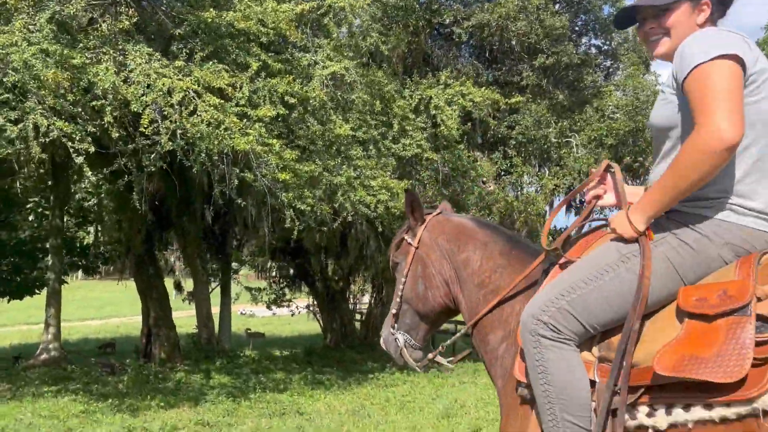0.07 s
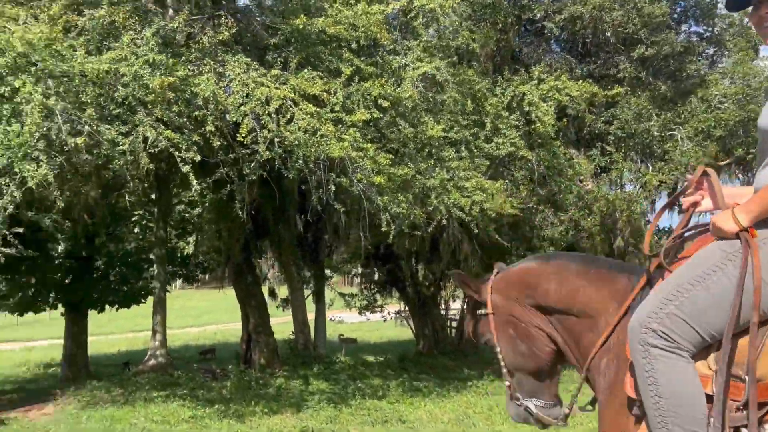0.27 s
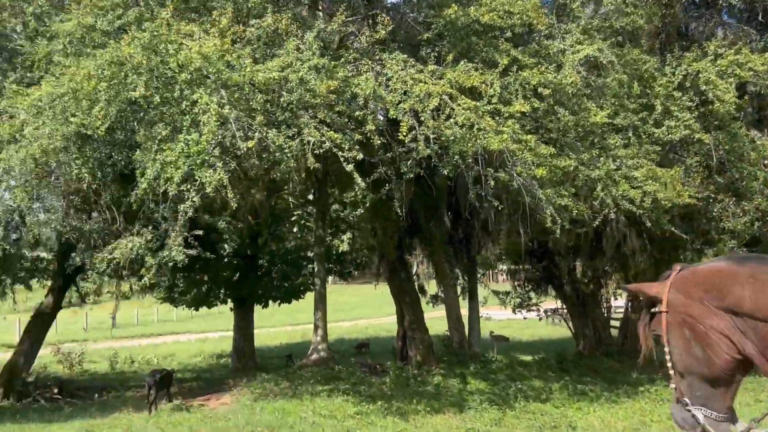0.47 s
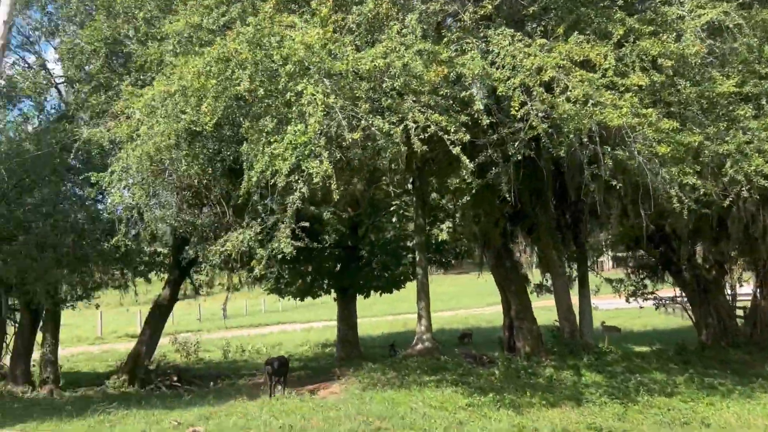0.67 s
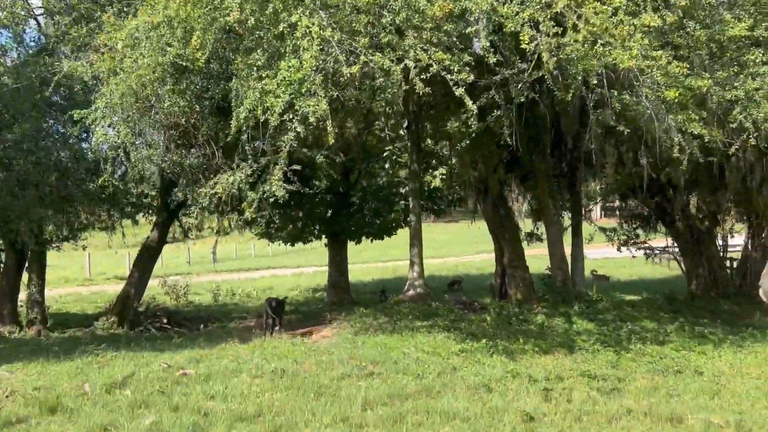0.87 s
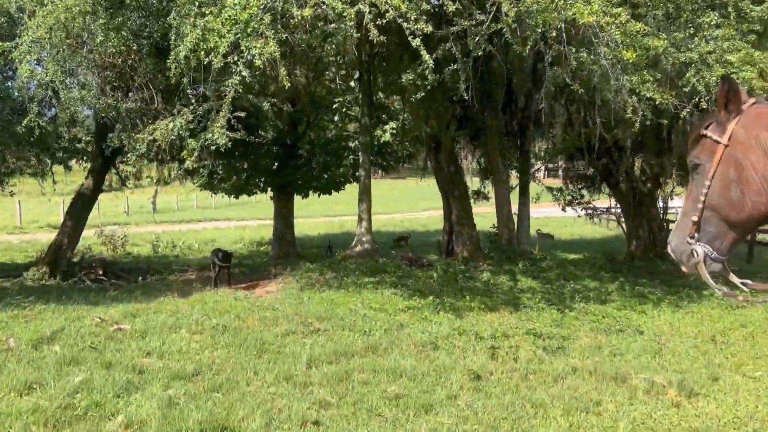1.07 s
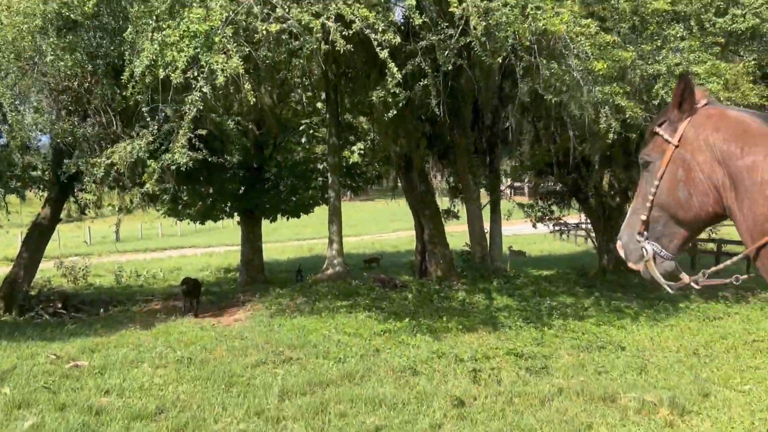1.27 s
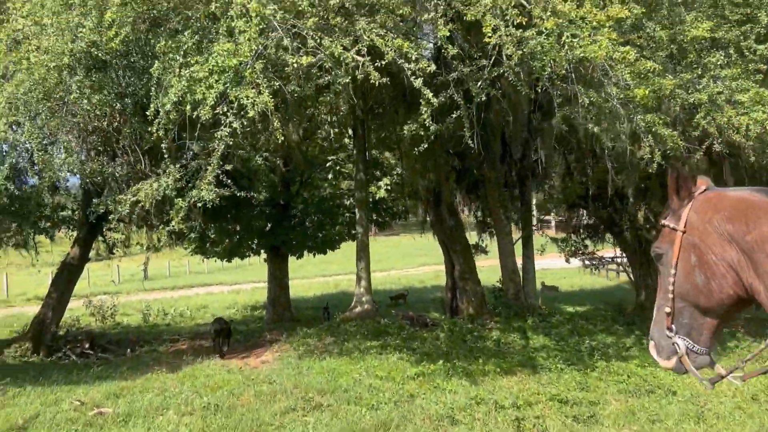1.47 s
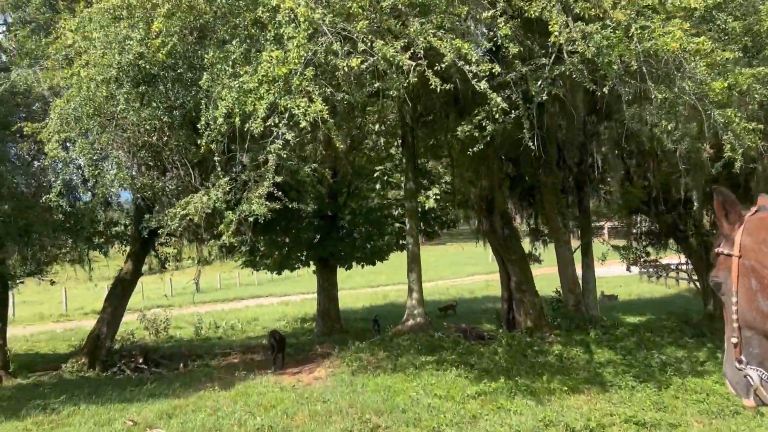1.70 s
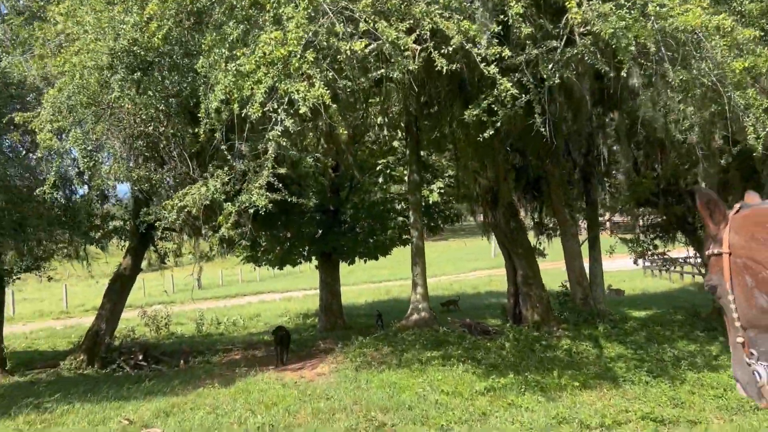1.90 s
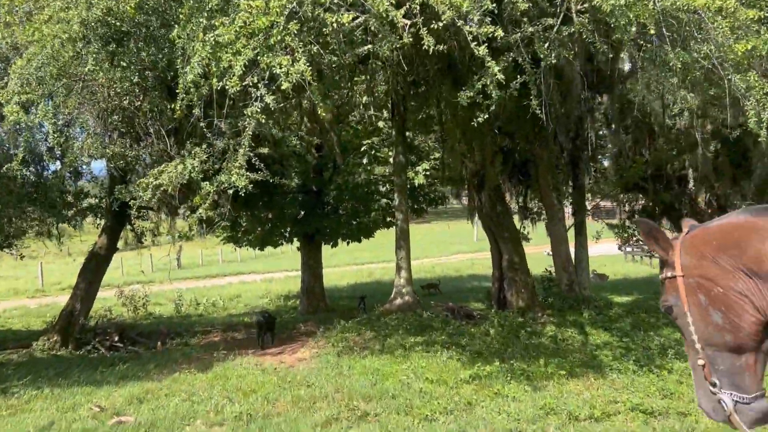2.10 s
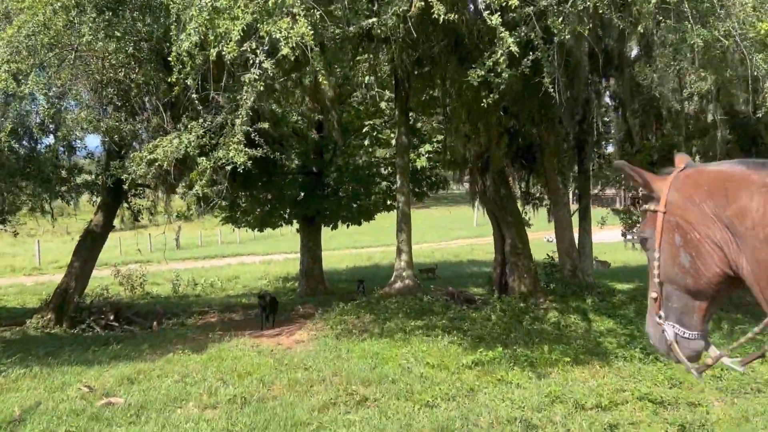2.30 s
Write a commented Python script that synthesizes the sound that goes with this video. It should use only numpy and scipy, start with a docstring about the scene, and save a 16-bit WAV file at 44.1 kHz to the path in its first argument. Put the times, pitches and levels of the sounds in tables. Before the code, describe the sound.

A horse snorts once, close by, starting at about 0.2 seconds; its nostrils flutter rapidly, then slow to a wet sputter that fades by 0.8 seconds. From about 0.6 seconds its hooves thud and scuff unevenly on soft turf until around 2.1 seconds. Brief dry rustles come from 1.3 seconds on. Light grass swishes, a low outdoor rumble and a faint hiss continue throughout.

```python
"""A pasture: a ridden horse snorts once, close by. Its nostrils flap some sixty times a second,
ringing the nose, then slow to a wet sputter as the air runs out. Its hooves then thud and scuff
on soft turf, with a fine swishing hiss of grass and brief dry rustles over a low outdoor rumble."""
import sys
import numpy as np
from scipy import signal
from scipy.fft import rfft, irfft
from scipy.io import wavfile
from scipy.ndimage import uniform_filter1d

SR = 44100
rng = np.random.default_rng(int(sys.argv[2]) if len(sys.argv) > 2 else 0)


def wav_out(sig):
    """Save sig, one row per channel (or a flat mono array), as 16-bit PCM at SR to the path in sys.argv[1]."""
    wavfile.write(sys.argv[1], SR, np.round(np.clip(np.atleast_2d(sig).T, -1, 1) * 32767).astype(np.int16))


N = 108045
T = np.arange(N) / SR
FREQS = np.fft.rfftfreq(N, 1 / SR) + 1e-3
FLICKER_DB, FLICKER_PER_S = 1.7, 35
TURF_SPREAD, TICK_SPREAD, HISS_SPREAD = .33, .25, .4  # side / middle

# spectrum of soft turf: freq_hz, gain_db
TURF_SPECTRUM = [(40, 7), (90, 10), (180, 9.5), (350, 4), (550, -4), (800, -23), (1300, -33), (3000, -31.5),
                 (8000, -84)]


def undb(db):
    """Decibels to gain."""
    return 10 ** (np.asarray(db) / 20)


def unit(x):
    """Scale to rms 1."""
    return x / np.sqrt(np.mean(x ** 2))


def curve(rows):
    """Join (time_s, value) rows by straight lines."""
    return np.interp(T, *np.array(rows).T)


def swells(rows):
    """Sum of bell envelopes from (centre_s, half_length_s, level_db) rows."""
    return sum(undb(db) * np.exp(-((T - centre_s) / half_s) ** 2) for centre_s, half_s, db in rows)


def colour(x, points):
    """Filter by (freq_hz, gain_db) points, then scale to rms 1."""
    hz, db = np.array(points).T
    gain = undb(np.interp(np.log(FREQS), np.log(hz), db))
    return unit(irfft(rfft(x) * gain, N))


def stereo(pair, spread):
    """Left and right from a middle and a side signal."""
    return (pair[0] + spread * pair[1] * np.array([[1], [-1]])) / np.hypot(1, spread)


def noise(spread):
    """Stereo white noise."""
    return stereo(rng.standard_normal((2, N)), spread)


def grains(per_s, spread):
    """Stereo clicks of random size at random moments."""
    return stereo(rng.standard_normal((2, N)) * (rng.random((2, N)) < per_s / SR), spread)


def drift(per_s):
    """Smooth random drift at rms 1."""
    hold = int(SR / per_s)
    steps = rng.standard_normal(N)[np.arange(N) // hold]
    return unit(uniform_filter1d(uniform_filter1d(steps, hold), hold))


def lag_left(x, lag_s=.000284, above_hz=1350):
    """Delay the treble of the left channel."""
    delay = np.exp(-2j * np.pi * lag_s * np.maximum(FREQS - above_hz, 0))
    return np.array([irfft(rfft(x[0]) * delay, N), x[1]])


def resonance(hz, width_hz):
    """Response of one steep resonance, keeping the power of white noise."""
    band = 1 / (1 + 1j * (FREQS / hz - hz / FREQS) * hz / (np.sqrt(2) * width_hz)) ** 2
    return band / np.sqrt(np.mean(np.abs(band) ** 2))


def resonate(drive, modes):
    """Ring parallel resonances, each from a fresh drive(hz), keeping the power."""
    spectrum, power = 0, 0
    for hz, width_hz, db, pan_db in modes:
        gain = undb(db) * np.sqrt(width_hz)
        pan = undb(np.array([[pan_db], [-pan_db]]) / 2)
        spectrum = spectrum + rfft(drive(hz)) * resonance(hz, width_hz) * gain * pan
        power += gain ** 2
    return irfft(spectrum, N) / np.sqrt(power)


def open_air(hiss_db=-53, swell_db=1):
    """A low rumble comes and goes under a faint, nearly steady hiss."""
    # rumble envelope: time_s, level_db
    rumble_levels = [(0, -38.5), (.07, -37.5), (.17, -53.5), (.26, -35), (.5, -37.5), (.8, -34.5),
                     (1.15, -35.5), (1.65, -36.5), (1.85, -34), (2.1, -38.5), (2.28, -40.5), (2.45, -37.5)]
    # rumble spectrum: freq_hz, gain_db
    rumble_spectrum = [(18, -62), (32, -18), (50, 2), (75, 1.5), (110, -9.5), (170, -14), (300, -26.5),
                       (700, -72), (3000, -69)]
    # hiss spectrum: freq_hz, gain_db
    hiss_spectrum = [(30, -4), (150, 5.5), (350, -2), (600, 2.5), (1000, -3), (2000, -7.5), (4000, -13.5),
                     (8000, -15), (16000, -33)]
    rumble = colour(noise(spread=.45), rumble_spectrum) * undb(curve(rumble_levels))
    hiss = colour(noise(HISS_SPREAD), hiss_spectrum) * undb(hiss_db + swell_db * drift(per_s=3.25))
    return rumble + hiss


def scuffs(bumps_per_s=700):
    """Many tiny bumps as the turf gives under the hooves."""
    # scuffing envelope: time_s, level_db
    scuff_levels = [(0, -43), (.07, -81), (.13, -57), (.79, -48), (.83, -38.5), (1.01, -30.5),
                    (1.06, -39.5), (1.14, -42), (1.2, -37.5), (1.41, -37), (1.52, -53.5), (1.57, -41),
                    (1.68, -46), (1.78, -51), (1.85, -45.5), (1.92, -42), (2.08, -38), (2.16, -53.5),
                    (2.31, -64), (2.38, -33.5), (2.45, -40.5)]
    return colour(grains(bumps_per_s, TURF_SPREAD), TURF_SPECTRUM) * undb(curve(scuff_levels))


def grass(blades_per_s=3600, flick_decay_s=.003, around_db=-6.5):
    """Blades brush past in swishes of dense ticks, softer all around, with a few sharp flicks."""
    # swish envelope: time_s, level_db
    swish_levels = [(0, -48), (.13, -50), (.165, -40.5), (.35, -38.5), (.6, -50), (.76, -48), (.83, -62),
                    (.91, -47.5), (.96, -59.5), (1.19, -61.5), (1.24, -44.5), (1.4, -49), (1.5, -49.5),
                    (1.52, -78), (1.565, -58), (1.595, -41.5), (1.71, -52), (1.76, -49), (1.83, -48.5),
                    (1.9, -49), (2.0, -53), (2.065, -46), (2.12, -59), (2.25, -52), (2.32, -62.5),
                    (2.37, -46.5), (2.45, -46.5)]
    # flicks of grass: start_s, level_db
    flick_events = [(0.1364, -34.5), (0.783, -47.5), (1.0074, -45), (1.397, -39), (1.498, -46),
                    (1.587, -41.5), (1.921, -47), (2.433, -37)]
    # spectrum of the near blades: freq_hz, gain_db
    near_spectrum = [(500, 3), (1200, 2), (2000, 6), (3200, -1), (5000, 0), (8500, 6.5), (12000, 7.5),
                     (16000, 7)]
    around_spectrum = [(1500, 8), (3200, 1), (6800, 3.5), (9000, -40.5)]
    flicks = sum(undb(db) * (T >= start_s) * np.exp(-np.abs(T - start_s) / flick_decay_s)
                 for start_s, db in flick_events)
    swish = undb(curve(swish_levels) + FLICKER_DB * drift(FLICKER_PER_S))
    around = colour(grains(blades_per_s, spread=1), around_spectrum) * undb(around_db)
    near = colour(grains(blades_per_s, TICK_SPREAD), near_spectrum)
    return (near + around) * (swish + flicks)


def thuds():
    """Short thuds of falling pitch, each with a hollow knock, on crumbling ground: mostly hooves, with two low
    puffs of breath as the snort fades."""
    # thuds: start_s, start_pitch_hz, level_db (the rows at 0.619 and 0.645 are low puffs of breath, the rest
    # hoof impacts)
    impacts = [(0.056, 286, -41), (0.619, 171, -22.5), (0.645, 260, -26.5), (0.736, 220, -30.5),
               (0.81, 588, -22.5), (0.819, 171, -20), (0.847, 637, -27), (0.884, 410, -32),
               (.898, 192, -25.5), (0.919, 272, -25), (.951, 473, -26.5), (0.962, 122, -21.5),
               (0.982, 650, -37), (1.006, 516, -33), (1.1872, 840, -19), (1.217, 554, -33),
               (1.232, 150, -32), (1.32, 623, -34.5), (1.388, 460, -33), (1.402, 291, -28.5),
               (1.452, 137, -31), (1.551, 656, -30.5), (1.566, 175, -28.5), (1.613, 400, -32.5),
               (1.909, 158, -26), (1.929, 892, -30.5), (1.967, 710, -28), (2.039, 610, -34.5),
               (2.062, 127, -28.5), (2.080, 832, -32)]
    end_hz, glide_s, attack_s, thud_decay_s = 63.5, .00489, .0017, .011
    knock_ratio, knock_decay_s, knock_db, crumble_db = .699, .0051, -10, -10
    crumble = undb(crumble_db) * colour(noise(TURF_SPREAD), TURF_SPECTRUM)
    out = np.zeros((2, N))
    for (start_s, hz, db), side in zip(impacts, rng.standard_normal(len(impacts))):
        age_s = np.maximum(T - start_s, 0)
        onset = 2 * undb(db) * (1 - np.exp(-(age_s / attack_s) ** 2))
        phase = 2 * np.pi * (end_hz * age_s + (hz - end_hz) * glide_s * (1 - np.exp(-age_s / glide_s)))
        tone = stereo([np.sin(phase), side * np.cos(phase)], spread=.2)
        thud = (tone + crumble) * np.exp(-age_s / thud_decay_s)
        knock = np.sin(2 * np.pi * knock_ratio * hz * age_s) * np.exp(-age_s / knock_decay_s)
        out += onset * (thud + undb(knock_db) * knock)
    return out


def turbulence(hz, wide_above_hz=700):
    """Rushing air to drive a resonance at hz, wider in stereo for higher ones."""
    return noise(spread=.55 * hz / np.hypot(hz, wide_above_hz))


def puffs(flaps_s, start_rate_hz, resonance_hz):
    """A soft slap and a puff of air per flap, uneven in time and size, over a steady leak."""
    half_s, jitter_s, scatter_db = .0043, .0024, 2.6
    leak, slap_db = .28, -12
    gate, slaps = np.zeros(N), np.zeros(N)
    for flap_s, (late, strong) in zip(flaps_s, rng.standard_normal((len(flaps_s), 2))):
        at_s = flap_s + jitter_s * late
        size = undb(scatter_db * strong)
        near = slice(int((at_s - 2 * half_s) * SR), int((at_s + 2 * half_s) * SR))
        gate[near] += size * np.exp(-((T[near] - at_s) / half_s) ** 2)
        slaps[int(at_s * SR)] = size * np.sqrt(SR / start_rate_hz)
    return (gate + leak) * turbulence(resonance_hz) + undb(slap_db) * slaps


def snort(half_narrow_s=.475, narrowing_s=.14, drops_per_s=5000, spray_db=-17.5):
    """Loose nostrils flap and spray fine drops; each flap rings the narrowing nose."""
    # nostril flapping: time_s, rate_hz
    flap_rates = [(.215, 61.2), (.37, 60.5), (.46, 53.2), (.55, 46), (.66, 37)]
    # force of the blow: time_s, level_db
    blow = [(.208, -32.5), (.23, -26), (.27, -23), (.32, -18), (.39, -21.5), (.46, -23.5), (.56, -22.5),
            (.6, -29.5), (.65, -34), (.68, -34), (.745, -54), (.79, -71)]
    # open nose resonances: freq_hz, width_hz, gain_db, left_minus_right_db
    open_modes = [(140, 70, -2, -1), (310, 80, 3, 0), (450, 220, -3, -1), (850, 110, 2.7, 5),
                  (1120, 90, -3, -1), (1400, 190, -2, -2), (1890, 110, -5, 2), (2280, 240, -9, 4),
                  (2780, 130, -7, -2), (3500, 560, -15, 2)]
    # narrowed nose resonances: freq_hz, width_hz, gain_db, left_minus_right_db
    narrow_modes = [(130, 70, -1, 0), (290, 160, -4, -2), (480, 180, -8, -1), (810, 100, 0, 1),
                    (1030, 170, -5, 3), (1530, 170, -10, 0), (2130, 210, -14, 1), (3600, 400, -22, 4)]
    spray_spectrum = [(2000, 5.5), (4000, 2.5), (6500, 2.5), (8500, -1), (11000, -16), (16000, -19)]
    start_s, start_rate_hz = flap_rates[0]
    end_s = flap_rates[-1][0]
    cycles = np.cumsum(curve(flap_rates) * (T > start_s)) / SR
    flap_count = int(cycles[int(end_s * SR)])
    flaps_s = T[np.searchsorted(cycles, np.arange(1, flap_count + 1))]
    force = undb(curve(blow)) * (T > blow[0][0]) * (T < blow[-1][0])
    narrow = np.clip(.5 + (T - half_narrow_s) / narrowing_s, 0, 1)
    nose = np.zeros((2, N))
    for modes, share in (open_modes, 1 - narrow), (narrow_modes, narrow):
        nose += resonate(lambda hz: puffs(flaps_s, start_rate_hz, hz) * force * np.sqrt(share), modes)
    spray = colour(grains(drops_per_s, TICK_SPREAD), spray_spectrum)
    spray *= force * undb(spray_db + FLICKER_DB * drift(FLICKER_PER_S))
    return nose + lag_left(spray)


def sputter():
    """As the pressure drops, the nostrils stick and burst open in separate wet flaps."""
    # wet flaps: centre_s, half_length_s, level_db
    wet_flaps = [(0.467, 0.0034, -23), (0.509, 0.0057, -34), (0.55, 0.0057, -28.5), (0.562, 0.0022, -32),
                 (.596, 0.0051, -27), (0.646, 0.015, -42), (0.697, 0.0057, -43.5), (0.737, 0.012, -49.5)]
    # wet flap resonances: freq_hz, width_hz, gain_db, left_minus_right_db
    wet_modes = [(1550, 250, -7, 0), (2180, 200, 0, 1), (3500, 300, -12, 4), (4600, 400, -16, 2)]
    bursts = swells(wet_flaps)
    return resonate(lambda hz: turbulence(hz) * bursts, wet_modes)


def last_air(peak_s=.61, peak_db=-33, rise_s=.045, fade_s=.064):
    """The remaining air leaves the still nostrils in a hollow, fading rush."""
    # still nose resonances: freq_hz, width_hz, gain_db, left_minus_right_db
    still_modes = [(330, 200, -4, 0), (800, 140, -5, 1), (1080, 100, 0, 2), (1560, 130, -7, 0)]
    envelope = undb(peak_db) * np.exp(-np.maximum((peak_s - T) / rise_s, (T - peak_s) / fade_s))
    return resonate(lambda hz: turbulence(hz) * envelope, still_modes)


def rustles(ticks_per_s=1400):
    """Short swells of dry rubbing ticks, as of the tack."""
    # rubs: centre_s, half_length_s, level_db
    rubs = [(1.307, 0.018, -45), (1.383, 0.0066, -46), (1.538, 0.051, -50.5), (1.596, 0.0058, -41.5),
            (1.882, 0.022, -41.5), (2.028, 0.003, -45), (2.432, 0.083, -48.5)]
    # rubbing spectrum: freq_hz, gain_db
    rub_spectrum = [(150, -16), (400, 12.5), (850, 10.5), (1600, -1), (2600, 1), (6000, -17)]
    return colour(grains(ticks_per_s, HISS_SPREAD), rub_spectrum) * swells(rubs)


def scene():
    """The horse on the open pasture."""
    horse = snort() + sputter() + last_air() + thuds() + scuffs()
    return horse + lag_left(rustles() + grass() + open_air())


def record(dry):
    """Steep low-pass on the top treble."""
    cutoff_hz = 15900
    return signal.sosfilt(signal.ellip(10, .2, 80, cutoff_hz, fs=SR, output="sos"), dry)


dry = scene()
out = record(dry)
wav_out(out)
```